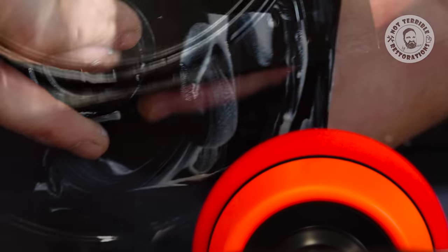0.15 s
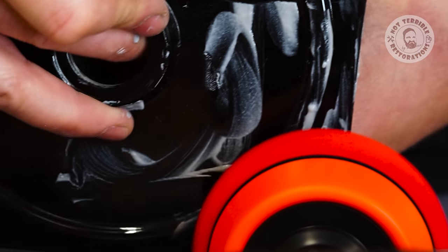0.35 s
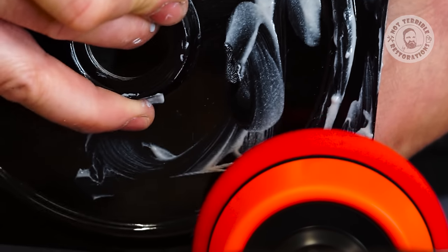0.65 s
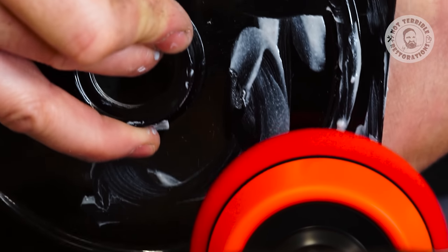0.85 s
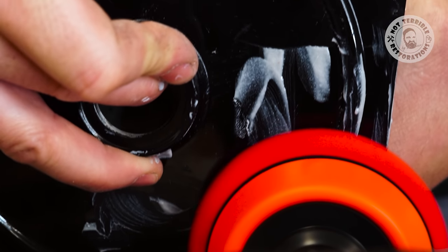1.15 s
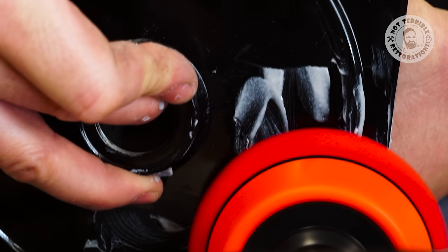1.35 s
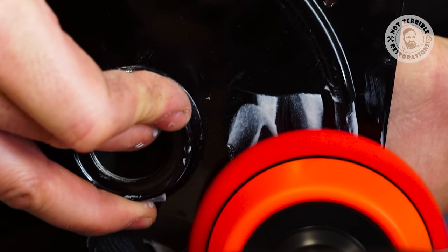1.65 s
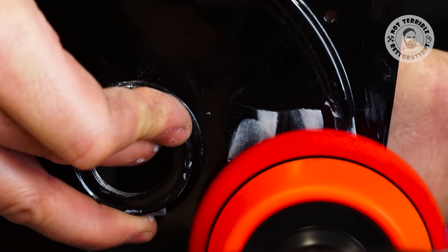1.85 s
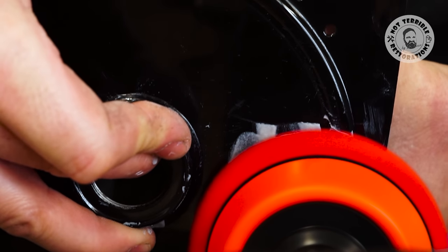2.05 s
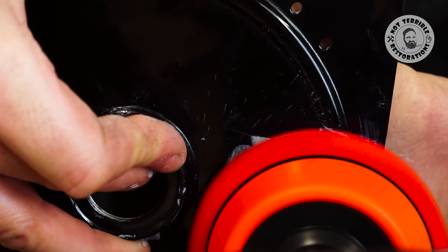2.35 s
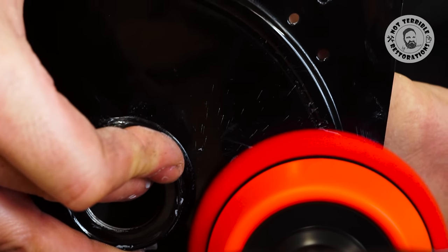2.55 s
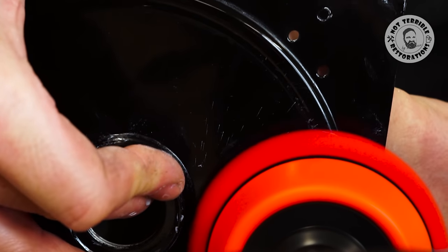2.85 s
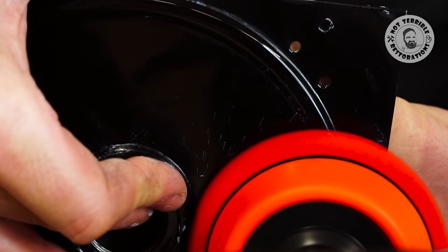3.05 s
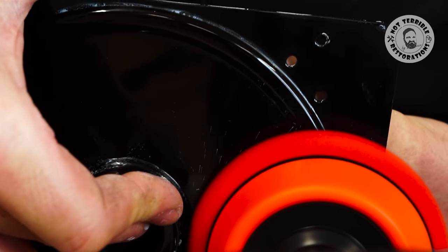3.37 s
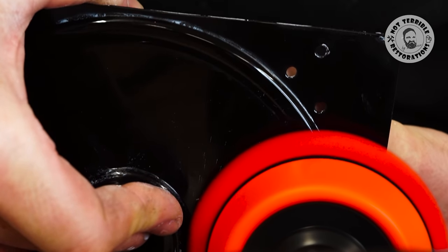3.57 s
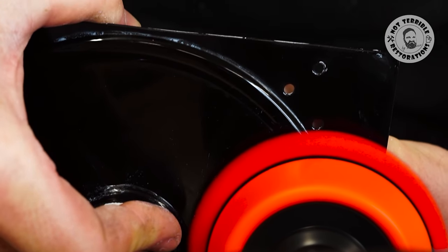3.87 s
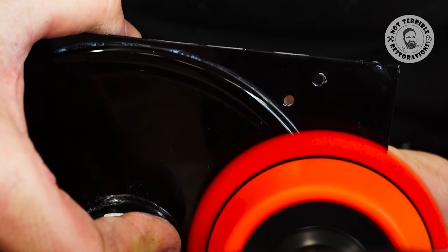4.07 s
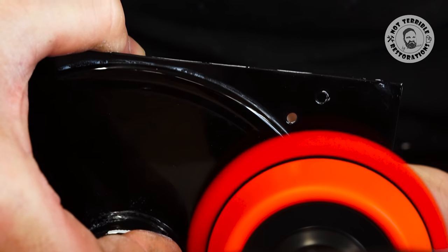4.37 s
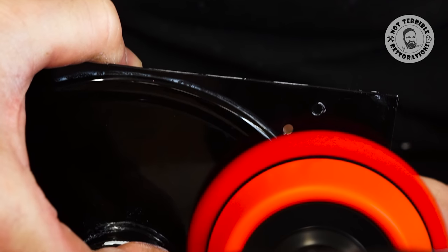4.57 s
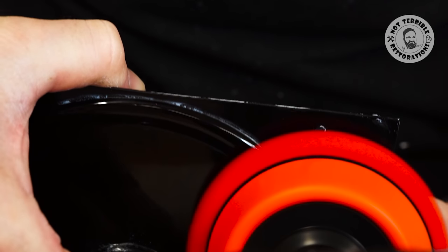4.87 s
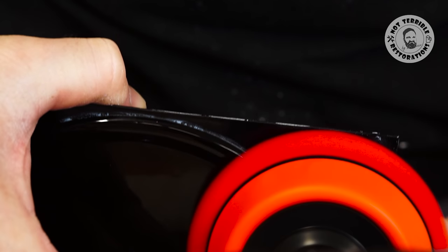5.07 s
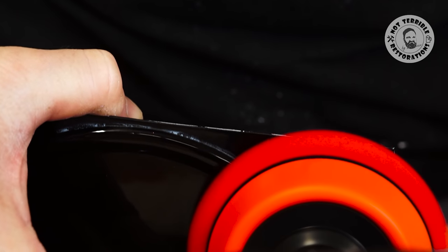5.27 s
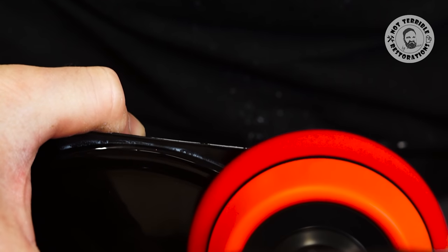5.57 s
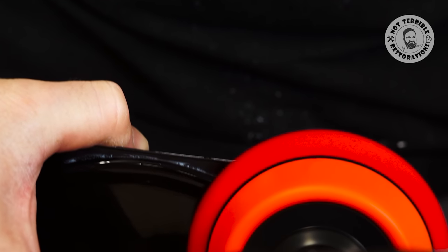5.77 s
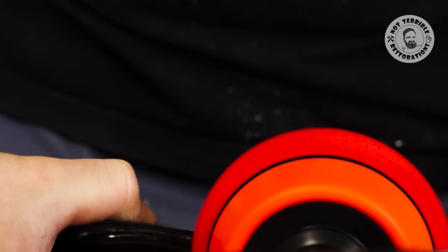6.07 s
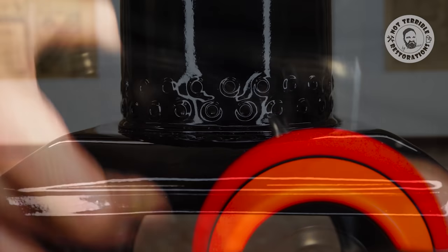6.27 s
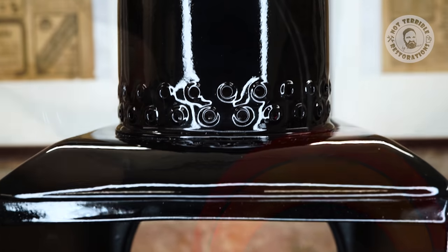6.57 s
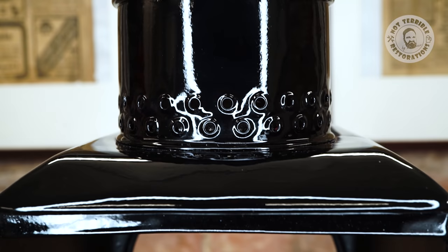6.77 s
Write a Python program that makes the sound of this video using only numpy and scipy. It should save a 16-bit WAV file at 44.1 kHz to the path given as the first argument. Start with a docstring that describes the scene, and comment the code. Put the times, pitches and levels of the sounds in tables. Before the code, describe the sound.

Indoors and close up, in wide stereo, a small geared motor spins a foam pad with a bright, breathy whirr. A painted metal plate bears on the pad; the pitch sags while wet polish hisses and a growl surges. The hiss dries away, a thin whine grows, then the plate lifts, the motor regains speed and everything fades into a very faint low rumble.

```python
"""Indoors, a pair of spaced microphone ports near a geared hand motor that spins a foam pad.
A painted metal plate is pressed on the pad, which slows the motor, then lifted. Commutator and gear
tones are sines locked to the motor speed; brushes, fan and rubbing foam are a wide whirr of noise
shaped by housing resonances. Wet polish adds a hiss. The tool fades out while a faint low rumble,
two wavering hums and a soft rush, rises."""
import sys
import numpy as np
from scipy import signal
from scipy.fft import rfft, irfft, next_fast_len
from scipy.io import wavfile
from scipy.ndimage import uniform_filter1d

SR = 44100
rng = np.random.default_rng(int(sys.argv[2]) if len(sys.argv) > 2 else 0)


def unload_audio(sound):
    """Save the sound as a 16-bit wav file, at the path given as the first command line argument."""
    columns = np.transpose(np.atleast_2d(sound))
    # keep every value between -1 and 1, then stretch to whole-number steps
    steps = np.round(np.clip(columns, -1, 1) * 32767)
    wavfile.write(sys.argv[1], SR, steps.astype(np.int16))


N = 305608
SIZE = next_fast_len(N + 16384)  # transform length, padded past the end

# Background hums: (frequency [Hz], start [s], rise [s], hold [s], fall [s], level [dB], waver [dB])
RUMBLE_HUMS = [(25.7, 5.98, 0.25, 0.69, .1, -78.5, 1.5), (80.6, 6.26, 0.082, 0.22, 0.86, -88, 1)]
# Colour of the background rush: (frequency [Hz], relative level [dB per Hz])
RUSH_COLOUR = [(40, -12), (110, -3), (320, 0), (450, -12), (900, -50)]
# Colour of the polish hiss: (frequency [Hz], relative level [dB per Hz])
POLISH_COLOUR = [(100, -40), (600, -6.0), (9000, 1.5), (15000, -16)]
# Resonances that ring in the polish hiss: (centre [Hz], width [Hz], gain [dB])
POLISH_RINGS = [(790, 160, 23.6), (2865, 130, 32), (5680, 400, 21), (6660, 1090, 18)]
# Whirr colour, pad free and pad pressed: (frequency [Hz], relative level [dB per Hz])
FREE_COLOUR = [(40, -69), (150, -22), (250, -27), (310, -43), (370, -33), (440, -18), (510, -13),
               (580, -14.5), (708, -7.5), (1000, -7.5), (1200, -3.5), (1540, -6.5), (2800, -1), (6880, -8),
               (14600, -8), (15700, -8)]
PRESSED_COLOUR = [(40, -55), (96, -48), (236, -33), (440, -28.5), (657, -12.5), (1000, -12), (1500, -7),
                  (1970, -5), (3250, -6), (3680, -7.5), (7700, -12.5), (9520, -13), (10800, -10),
                  (13000, -12), (15700, -11.5)]
# Housing resonances, pad free and pad pressed: (centre [Hz], width [Hz], gain [dB])
FREE_RINGS = [(860, 32, -4), (1194, 530, 4), (2020, 430, 3.5), (2700, 99, 0.5), (2860, 110, 3.5),
              (3690, 60, 2), (4140, 110, 1), (4800, 190, 2.5), (5260, 150, 4.5), (7200, 270, 2),
              (8900, 140, 3.5), (11060, 260, 3.5), (13600, 200, -5), (14050, 330, 2.5), (14550, 300, 2.5),
              (15100, 200, -6)]
PRESSED_RINGS = [(340.3, 4.8, 7.5), (546, 3, 9), (662.6, 18, 8.5), (755, 11, 5.5), (860, 40, -1.5),
                 (1016, 43, -7.5), (1095, 355, 8), (1510, 60, -3), (1625, 25, 2.5), (1810, 30, 4.5),
                 (1836, 30, 4.5), (1931, 32, 8), (1981, 74, 5), (2080, 76, 4.5), (2160, 60, 0),
                 (2347, 194, 8), (2820, 170, 4.5), (3210, 270, 4), (3880, 60, 2.5), (4043, 62, 6.5),
                 (4360, 90, 5.5), (4860, 70, -4), (4840, 42, 4), (4930, 82, 8), (5940, 100, 3),
                 (6330, 380, 3), (7060, 330, 4.2), (7600, 180, -1), (8080, 120, 3), (8430, 310, 3.3),
                 (11840, 200, 3.5), (13080, 250, -4), (13700, 150, 0), (13950, 220, 2.5),
                 (14700, 360, -0.5), (15100, 200, -2)]
# Motor speed: (time [s], commutator rate [Hz])
MOTOR_SPEED = [(0.0, 560.5), (0.13, 567.0), (0.2, 582.5), (0.4, 585.0), (0.68, 586.5), (0.9, 584.0),
               (1.05, 577.0), (1.5, 551.3), (1.9, 540.3), (2.4, 536.0), (3.0, 531.5), (3.8, 529.7),
               (5.0, 531.3), (5.75, 537.2), (5.9, 539.8), (6.2, 558.8), (6.5, 574.9), (6.93, 585.9)]
# Gear and commutator tones: (multiple of the commutator rate)
TONE_ORDERS = [.1225, .245, .49, .511, .632, .752, 1, 1.39, 2, 2.462, 3, 3.62, 4, 4.38, 5, 9, 11, 12, 17,
               19, 20, 21, 22, 24, 25, 26]
# Their drive before the housing, relative to WHIRR_DB: (level when free [dB], level when pressed [dB])
TONE_LEVELS = [(-56, -57), (-62, -56), (-51, -50), (-65, -61), (-52, -51), (-66, -45.5), (-25, -42),
               (-49, -38), (-26.5, -34.5), (-21, -34), (-38, -26.5), (-57, -32.5), (-35, -26.5),
               (-37, -25.5), (-35, -30), (-37, -25.5), (-48, -28), (-46, -33), (-56, -28), (-28, -30),
               (-43, -19), (-37, -30), (-48, -26), (-24, -26), (-53, -35), (-55, -31)]
# Gear mesh tone and sidebands: (offset [pad turns], balance when free [dB], balance when pressed [dB])
MESH_SIDEBANDS = [(-3, -9, -30), (-2, -9, -30), (-1, -25, -28), (0, -2, -2), (1, -16, -4), (2, -20, -14),
                  (3, -28, -21)]
# Joint drive of the gear growl before the housing: (time [s], level [dB])
GROWL_LEVEL = [(0, -83), (.15, -67), (.25, -77), (.5, -74), (.95, -76), (1.25, -63), (1.5, -66.5),
               (2.0, -70.5), (2.6, -78.5), (3.5, -79.5), (4.9, -79.5), (5.6, -75), (6.3, -77.5),
               (6.65, -84), (6.9, -104)]
# Drive of the loudest whine before the housing; it grows as the pad bears down and the polish
# dries: (time [s], level [dB])
WHINE_LEVEL = [(0, -80), (1.2, -80), (1.85, -70.5), (2.4, -76), (2.9, -72), (3.4, -66.5), (4.3, -64.5),
               (5.75, -65.5), (6.1, -68.5), (6.5, -86), (6.93, -110)]
# The room and the spaced ports unlink the treble: (frequency [Hz], side minus mid [dB])
STEREO_WIDTH = [(60, -23), (110, -33), (200, -56), (380, -21), (700, -8), (1290, -6), (2380, -4.5),
                (4400, -1.5), (8120, 1.5), (15000, -1.5)]
# Balance of the two ports: (frequency [Hz], left minus right [dB])
PORT_BALANCE = [(250, 0), (700, -2.3), (1290, -2.6), (2380, -.8), (4400, -2), (15000, -2.3)]

RUSH_SWELL, RUSH_DB = (5, 1.2, .95, .15), -94  # (start [s], rise [s], hold [s], fall [s]), level [dB]
POLISH_SWELL, POLISH_DB = (0.62, 0.25, 1.36, 2), -11  # the same columns; level relative to the whirr
WHIRR_DB = -48
FADE_START_S, FADE_END_S = 5.924, 6.904  # fade of the whirr, hum and tone orders

FREE_HZ, LOADED_HZ = 586, 531  # commutator rate with the pad free and pressed
INERTIA_S = 0.15  # the motor speed lags the pressure on the pad
# Multiples of the commutator rate; PAD is one turn of the pad
ROTOR, MESH, PAD, WHINE_ORDER = .3127, .3674, .0101, 6
# The rotor hum swells where it meets a low housing resonance: (centre [Hz], width [Hz], level there [dB])
HUM_RING = (178.1, 11.1, -65)
HUM_SPEEDUP_DB = 0.0043  # per Hz/s of commutator rate gained
SETTLE_DB = -5.5  # the hum settles by this much as the polish is worked in
# A narrow resonance favours the nearest sideband: (centre [Hz], width [Hz], gain [dB])
GROWL_RING = (208.2, 5, 20)
# A tone that the load mutes drops at first touch, one that it raises comes late: powers of the load
MUTE_POWER, RAISE_POWER = .65, 2
# Low tones sing out as the motor gains speed: dB per Hz/s, up to this many Hz/s, below this multiple
LIFT_DB, LIFT_MOST, LIFT_TOP = .11, 35, 2.5
PATCHY_DB = 1.2  # each tone comes and goes on its own as the grip shifts
# Share of the side that echoes the direct sound, phase step [radians per bin], and sway of the level
ECHO_SHARE, ECHO_WANDER, ECHO_LEVEL = .22, .07, .45
HISS_DB, TOP_HZ = -91, 15750  # microphone noise before the top cut, and where that cut begins


def undb(db):
    """Amplitude ratio of a level in dB."""
    return 10 ** (np.asarray(db) / 20)


def curves(table):
    """Columns of a timed table, one value per sample."""
    s, *columns = np.transpose(table)
    return [np.interp(np.arange(N) / SR, s, c) for c in columns]


def over_hz(points):
    """A (frequency, value) table read at every bin, on a log frequency scale."""
    hz, value = np.transpose(points)
    bins = np.fft.rfftfreq(SIZE, 1 / SR)
    return np.interp(np.log(bins + 1), np.log(hz), value)


def walk(rate):
    """Random levels held 1 / rate s and slewed twice; spread near 1."""
    k = int(SR / rate)
    steps = np.repeat(rng.standard_normal(N // k + 1), k)
    return 1.45 * uniform_filter1d(uniform_filter1d(steps, k), k)[:N]


def swell(start, rise, hold, fall):
    """Rise, hold and fall in dB: 0 at the top, -35 outside."""
    corners = np.cumsum([start, rise, hold, fall])
    return -35 * (1 - np.interp(np.arange(N) / SR, corners, [0, 1, 1, 0]))


def ring(hz, centre_hz, width, db):
    """Level of a tone at hz that drives a steep resonance."""
    return db - 20 * np.log10(1 + (2 * (hz - centre_hz) / width) ** 2)


def ring_db(peaks):
    """Summed gain of broad-skirted resonances at every bin."""
    hz = np.fft.rfftfreq(SIZE, 1 / SR)
    return sum(db / (1 + (2 * (hz - f) / w) ** 2) for f, w, db in peaks)


def tone(turns, db, flutter_db, slip):
    """A sine at rms db that flutters in level and slips in phase."""
    level = np.sqrt(2) * undb(db + flutter_db * walk(13))
    return level * np.sin(2 * np.pi * (turns + rng.random()) + slip * walk(20))


def whirr(colour, peaks):
    """Noise through resonances, direct row at rms 1; a second, unrelated row is the room's share."""
    noise = rfft(rng.standard_normal((2, SIZE)))
    out = irfft(noise * undb(over_hz(colour) + ring_db(peaks)), SIZE)[:, :N]
    return out / np.std(out[0])


def rumble():
    """Background: a faint low rush of noise and two wavering low hums near the end."""
    time = np.arange(N) / SR
    out = whirr(RUSH_COLOUR, [])[0] * undb(RUSH_DB + swell(*RUSH_SWELL))
    for hz, start, rise, hold, fall, db, waver_db in RUMBLE_HUMS:
        hum = tone(hz * time, db + swell(start, rise, hold, fall), waver_db, 0.3)
        out = out + (time > start) * hum
    return out


def polish_hiss(wet):
    """Wet polish under the pad: resonant noise that follows the wetness."""
    return wet * undb(POLISH_DB + 0.8 * walk(7)) * whirr(POLISH_COLOUR, POLISH_RINGS)


def tool_whirr(turns, load, wet, fade_db):
    """Brushes, fan and rubbing foam: free and pressed noise trade power as the load grows."""
    rub = load ** 1.3
    free = np.sqrt(1 - rub) * whirr(FREE_COLOUR, FREE_RINGS)
    pressed = np.sqrt(rub) * whirr(PRESSED_COLOUR, PRESSED_RINGS)
    air = free + pressed + polish_hiss(wet)
    air = air * (1 + 0.1 * np.cos(2 * np.pi * turns))  # brush noise pulses at each commutator bar
    # the treble flickers more than the body of the whirr
    high_pass = signal.butter(2, 3500, "high", fs=SR, output="sos")
    treble = signal.sosfiltfilt(high_pass, air)
    air = air + treble * (undb(0.35 * walk(25.08)) - 1)
    # uneven foam: the whole whirr surges a few times a second, with finer flicker
    surge_db = .5 * walk(6) + 0.13 * walk(20.82) + 0.33 * walk(60)
    return air * undb(WHIRR_DB + fade_db + surge_db)


def rotor_hum(hz, turns, speedup, wet, fade_db):
    """The rotor's tone swells near a low resonance and settles as the polish is worked in."""
    settle_db = SETTLE_DB * np.cumsum(wet) / np.sum(wet)
    db = ring(ROTOR * hz, *HUM_RING) + HUM_SPEEDUP_DB * speedup + fade_db + settle_db
    return tone(ROTOR * turns, db, 1.5, 0.39)


def growl(hz, turns, load):
    """The gear mesh tone and its sidebands share one level and beat once per pad turn."""
    step, free_db, pressed_db = np.transpose(MESH_SIDEBANDS)[:, :, None]
    order = MESH + step * PAD
    centre_hz, width, gain_db = GROWL_RING
    resonance_db = gain_db / (1 + (2 * (order * hz - centre_hz) / width) ** 2) ** 2
    db = free_db + load * (pressed_db - free_db) + resonance_db
    # bring their joint power to the growl level
    db = db - 10 * np.log10(np.sum(undb(db) ** 2, axis=0)) + curves(GROWL_LEVEL)[0]
    return sum(tone(k * turns, d + walk(3), 1.2, .3) for k, d in zip(order, db))


def order_tones(turns, speedup, load, fade_db):
    """Gear and commutator sines at fixed multiples of the motor speed, muted or raised by the load."""
    lift_db = LIFT_DB * np.clip(speedup, 0, LIFT_MOST)
    out = 0
    for order, (free_db, pressed_db) in zip(TONE_ORDERS, TONE_LEVELS):
        power = RAISE_POWER if pressed_db > free_db else MUTE_POWER
        db = WHIRR_DB + fade_db + free_db + load ** power * (pressed_db - free_db)
        db = db + (order < LIFT_TOP) * lift_db + PATCHY_DB * walk(2.46)
        out = out + tone(order * turns, db, 1.4, 0.057 * order ** .5)
    return out


def loud_whine(turns):
    """The sixth order, the loudest whine and the roughest: fast level jitter and deep phase slip."""
    return tone(WHINE_ORDER * turns, curves(WHINE_LEVEL)[0] + 1.8 * walk(70), 1.1, 0.54)


def motor_tones(hz, turns, speedup, load, wet, fade_db):
    """Main source: hum, growl and whines, all locked to the motor speed."""
    hum = rotor_hum(hz, turns, speedup, wet, fade_db)
    whines = order_tones(turns, speedup, load, fade_db) + loud_whine(turns)
    return hum + whines + growl(hz, turns, load)


def spaced_ports(near, room, tones):
    """Two ports hear the direct sound as mid; room noise and short echoes make the side."""
    # a gliding tone swells as it crosses a housing resonance
    whine = rfft(tones, SIZE) * undb(ring_db(PRESSED_RINGS))
    mid = rfft(near, SIZE) + whine
    # echoes shift mainly the phase between the ports, by an angle that wanders over frequency
    angle = np.cumsum(ECHO_WANDER * rng.standard_normal(len(mid)))
    wander = ECHO_LEVEL * np.cos(angle) + 1.3j * np.sin(angle)
    echo = np.sqrt(ECHO_SHARE) * wander * (mid + 1.8 * whine)
    unlinked = np.sqrt(1 - ECHO_SHARE) * rfft(room, SIZE)
    side = undb(over_hz(STEREO_WIDTH)) * (echo + unlinked)
    tilt = over_hz(PORT_BALANCE) / 2
    ports = np.array([mid + side, mid - side]) * undb([tilt, -tilt])
    return irfft(ports, SIZE)[:, :N]


def scene():
    """Motor speed gives the load; speed and load drive the tool, heard over the rumble."""
    hz, = curves(MOTOR_SPEED)
    turns = np.cumsum(hz) / SR
    speedup = uniform_filter1d(np.gradient(hz) * SR, int(.2 * SR))  # Hz/s
    load = np.clip((FREE_HZ - hz - INERTIA_S * speedup) / (FREE_HZ - LOADED_HZ), 0, 1)
    wet = undb(swell(*POLISH_SWELL))
    left = np.clip((FADE_END_S - np.arange(N) / SR) / (FADE_END_S - FADE_START_S), 0, 1)
    fade_db = 20 * np.log10(np.sin(np.pi / 2 * left) + 0.0067)  # quarter sine down to a faint floor
    near, room = tool_whirr(turns, load, wet, fade_db)
    tones = motor_tones(hz, turns, speedup, load, wet, fade_db)
    return spaced_ports(near + rumble(), room, tones)


def record(dry):
    """Faint microphone hiss is added, then a steep low-pass cuts the top."""
    hiss = undb(HISS_DB) * rng.standard_normal(dry.shape)
    low_pass = signal.ellip(12, .2, 60, TOP_HZ, fs=SR, output="sos")
    return signal.sosfilt(low_pass, dry + hiss)


dry = scene()
out = record(dry)
unload_audio(out)
```